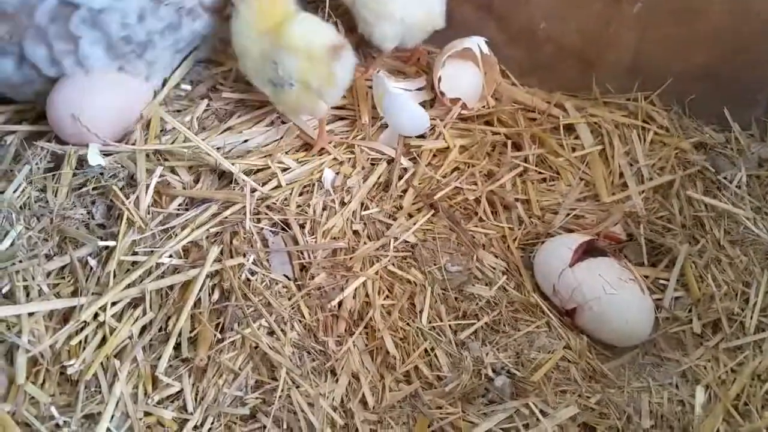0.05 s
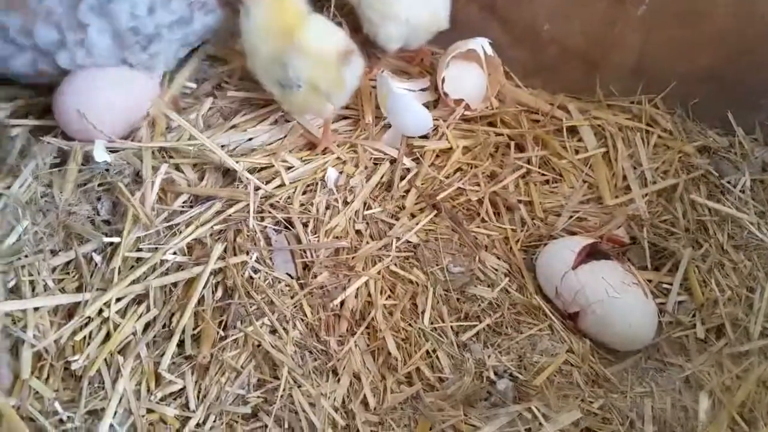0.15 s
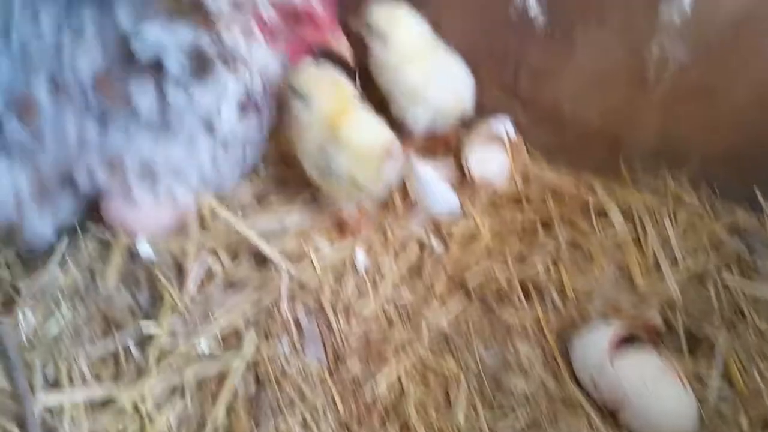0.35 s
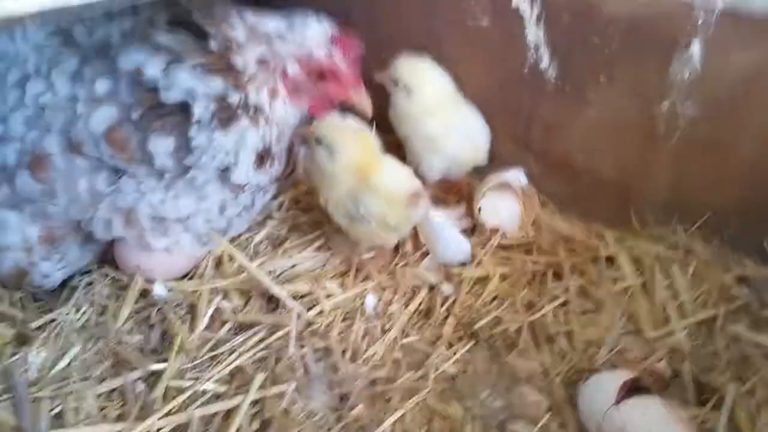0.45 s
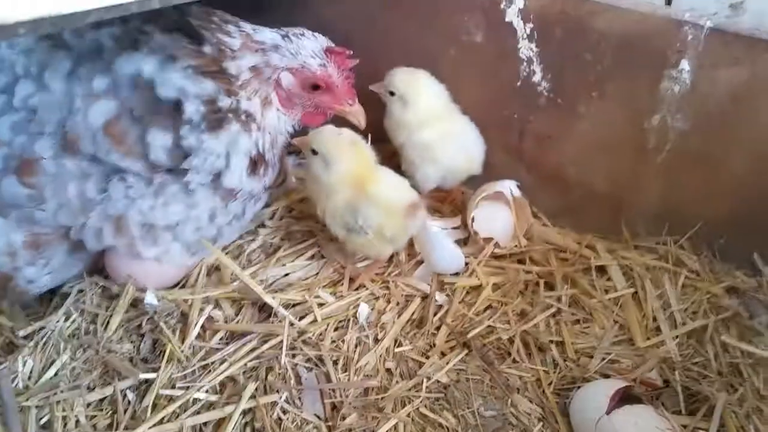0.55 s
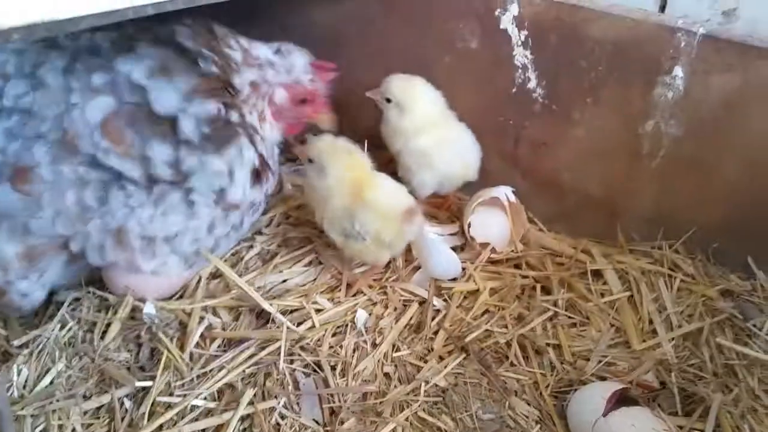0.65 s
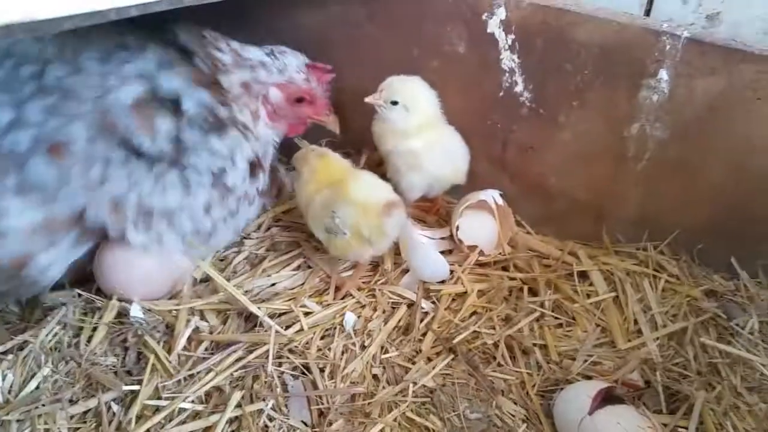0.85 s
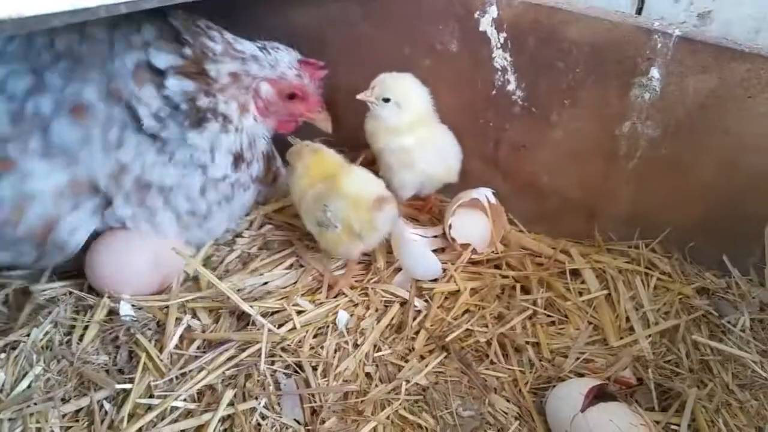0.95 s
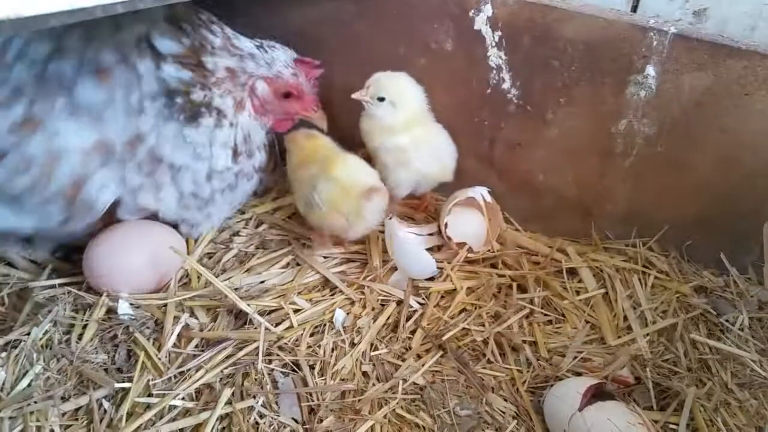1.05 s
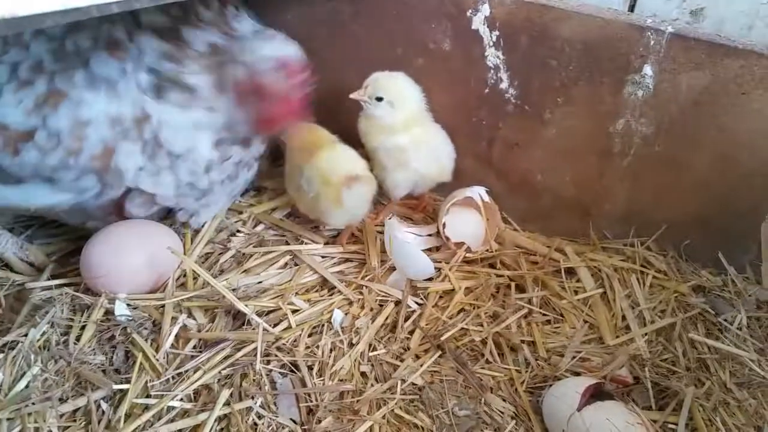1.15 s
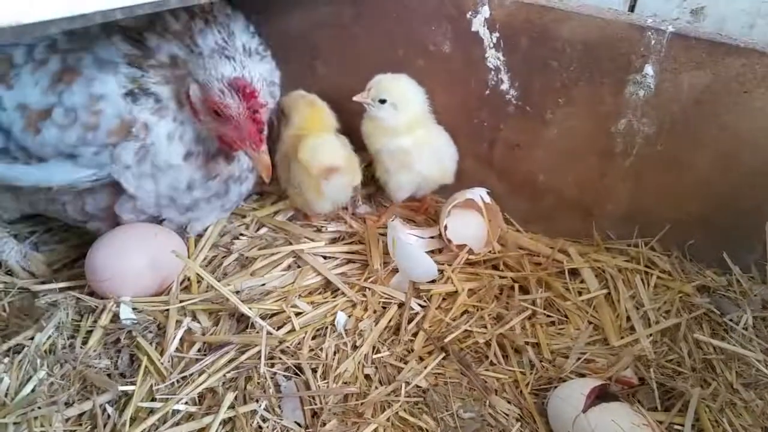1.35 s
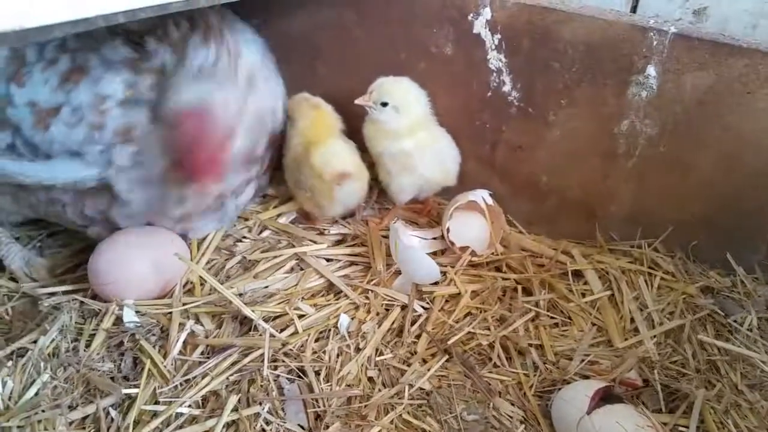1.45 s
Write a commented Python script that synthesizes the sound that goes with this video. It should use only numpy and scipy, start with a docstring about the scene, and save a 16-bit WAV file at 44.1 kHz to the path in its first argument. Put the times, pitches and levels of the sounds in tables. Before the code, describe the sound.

A hen clucks three times, close and a little to the left, murmuring softly in between. Her chicks give high, falling peeps around the clucks, while dry straw faintly rustles and ticks in a wooden nest box.

```python
"""In a wooden nest box, close by and a little to the left, a hen clucks three times and murmurs between.
Each cluck is a low, rough syllable and then a short, higher, louder one. Her voice is a source and a
filter: pulses of the syrinx excite the resonances of the throat. Her chicks give falling, nearly pure
peeps, and the box reflects both voices. Straw rustles and ticks as dry stalks crack; the hen shifts,
and a soft, breathy rustle comes and goes over a quiet background."""
import sys
import numpy as np
from scipy import signal
from scipy.fft import rfft, irfft
from scipy.io import wavfile
from scipy.ndimage import uniform_filter1d

SR = 44100
rng = np.random.default_rng(int(sys.argv[2]) if len(sys.argv) > 2 else 0)


def generate_wav(signal):
    """Clip the signal to [-1, 1] and save it as 16-bit WAV at the path in sys.argv[1]."""
    frames = np.transpose(np.atleast_2d(signal))
    scaled = np.clip(frames, -1, 1) * 32767
    pcm = np.round(scaled).astype(np.int16)
    wavfile.write(sys.argv[1], SR, pcm)


N = 66150

# Levels are relative: each source applies its own gain. A positive pan lies to the left.
# Spectra of the background, the shifting hen, a breathy upper-mid rustle and the straw: f/Hz, level/dB
BACKGROUND_SPECTRUM = [(20, -11), (45, -2), (100, -2), (190, -0.5), (330, -2.5), (480, 1), (620, -3.5),
                       (760, -11), (1000, 1), (1300, -23), (2400, -27), (4000, -56.5), (7500, -61.5),
                       (12000, -26.5), (15500, -39)]
SHIFTING_SPECTRUM = [(40, -27), (110, -11), (190, -3.5), (300, -13.5), (500, -24), (1000, -25),
                     (3000, -40.5)]
UPPER_RUSTLE_SPECTRUM = [(300, -10), (1000, -5.5), (1500, -7), (2100, 3.5), (2600, 1.5), (3300, -6.5),
                         (5000, -8.5), (7000, -21.5), (15000, -73)]
STRAW_SPECTRUM = [(200, -24.5), (600, 6.5), (1000, -5), (1500, 3.5), (2300, -0.5), (4000, 1), (7000, -11.5),
                  (12000, -8), (16000, -13.5)]
# Likeness of the noise at left and right: f/Hz, coherence/1
COHERENCE = [(50, 0.83), (180, 1), (550, 0.77), (1600, 0.067), (5000, 0.035)]
# Envelopes of the shifting hen, the upper-mid rustle and the straw: t/s, level/dB
SHIFTING_ENVELOPE = [(0, -54), (.15, -60), (.22, -46.5), (.3, -46.5), (.34, -40), (.42, -35.5), (.5, -54),
                     (.62, -48), (.9, -44.5), (1.0, -62), (1.08, -48), (1.18, -52.5), (1.25, -48.5),
                     (1.5, -45)]
UPPER_RUSTLE_ENVELOPE = [(0, -69), (.06, -58.5), (.12, -53), (.195, -52), (.22, -42), (.255, -40.5),
                         (.28, -54), (.38, -43), (.5, -53), (.66, -49.5), (.75, -46), (.95, -49),
                         (1.0, -48), (1.1, -50.5), (1.2, -51), (1.4, -49), (1.5, -55.5)]
STRAW_ENVELOPE = [(0, -50.5), (.07, -77), (.16, -64), (.22, -51.5), (.24, -40.5), (.265, -44), (.29, -47.5),
                  (.308, -46), (.324, -42), (.345, -55), (.38, -70), (.48, -48.5), (.52, -53), (.65, -51),
                  (.85, -57), (1.1, -55), (1.25, -57), (1.41, -54.5), (1.5, -57.5)]
# Snapping stalks: t/s, level/dB, tilt/(dB/octave), decay time/s
STRAW_SNAPS = [(0.036, -55, 2, 0.0061), (.072, -37, -8.5, 0.0014), (0.3781, -33.5, 1, 0.00098),
               (.521, -35, -12.5, 0.00069), (0.5493, -45, -13, 0.0014), (.795, -41.5, -2.5, 0.011),
               (.707, -38.5, -6.5, 0.011), (.97, -44.5, 14, 0.0012), (1.023, -46.5, 5, 0.0043),
               (1.127, -47, -0.5, .002), (1.383, -37.5, 1, 0.0017), (1.406, -41.5, 0, 0.0075)]

# Reverberation time of the box: f/Hz, T60/s
BOX_T60 = [(200, 0.083), (600, 0.12), (3000, 0.077), (10000, 0.11)]
# Early reflections of a peep off the walls, a left and a right list: delay/s, level/dB
WALL_REFLECTIONS = [
    [(.0021, -33), (.0068, -29)],
    [(.0033, -9), (.0052, -5.5)],
]
# Short peeps: t/s, duration/s, level/dB, start f/Hz, middle f/Hz, end f/Hz,
# loudest point/duration, pan/dB, second harmonic/dB
SHORT_PEEPS = [(-.02, .055, -55.5, 3736, 3583, 2850, .5, 8, -29),
               (0.37, 0.093, -40, 4200, 4396, 3660, 0.56, 11, -23),
               (0.867, 0.028, -46.5, 5476, 5110, 3430, 1, 12, -35),
               (0.893, 0.014, -37.5, 3570, 3340, 2250, 0, 3, -35),
               (1.259, 0.031, -46, 5470, 5090, 3720, 1, 5, -37),
               (1.29, 0.0073, -36.5, 3250, 2580, 2400, 0, 22, -19),
               (1.314, .068, -45.5, 4180, 4060, 3680, 0.62, 12, -38)]
# Course of one long falling peep: t/s, f/Hz, level/dB
LONG_PEEP = [(0.582, 4429, -38), (0.596, 4524, -49), (0.616, 4383, -33), (0.642, 3960, -27),
             (0.646, 3870, -28), (0.652, 3996, -45), (0.66, 3987, -35.5), (0.68, 3428, -38.5),
             (0.698, 3172, -27.5), (0.712, 2682, -33.5), (0.718, 2661, -35)]

# Low first syllables of the clucks, and soft notes (the tail of a cluck at the start, then murmurs):
# t/s, duration/s, level/dB, start f/Hz, middle f/Hz, end f/Hz, tilt/(dB/octave), roughness/1
LOW_SYLLABLES = [(.3935, 0.025, -24.5, 271.5, 234, 362, 3.5, 0.37),
                 (.8265, 0.025, -22.5, 268.6, 275.7, 362, 6.5, 0.31),
                 (1.129, 0.037, -21.5, 258.2, 245.6, 253, 3, 0.24)]
SOFT_NOTES = [(-.006, 0.023, -43, 627, 620, 594, -9.5, 0.03), (0.203, 0.035, -31.5, 235, 216.9, 213, 2, 0),
              (.226, 0.039, -35, 203.8, 213, 233, 0.5, 0), (.256, 0.043, -42.5, 196, 189, 187, -31, 0),
              (.366, 0.0324, -33, 419, 479, 505, 2, 0.31), (0.513, .02, -42, 460, 500, 490, 3.5, 0),
              (.549, 0.021, -44.5, 533, 506, 503, 3.5, 0.07), (.552, 0.035, -40.5, 192, 192, 181, -42, 0.2),
              (.647, 0.022, -37.5, 458, 492, 500, -4, .1), (0.703, 0.013, -35.5, 495, 496, 460, 8, 0.18),
              (0.719, 0.016, -46, 285, 254, 200, -6, 0.5), (1.231, 0.0049, -38.5, 214, 222, 198, 9, 0.54)]
# High second syllables, whose pitch breaks downward: t/s, duration/s, level/dB,
# f before/Hz, f after/Hz, time to the break/s, tilt/(dB/octave)
HIGH_SYLLABLES = [(0.4449, 0.015, -15.5, 608, 472, 0.0047, 2),
                  (0.8743, 0.02, -15, 630.5, 484.5, 0.00607, 0.5),
                  (1.1883, .019, -16, 643, 463, .0095, -1.5)]
# Vocal tract responses for low syllables, soft notes and high syllables: f/Hz, gain/dB
THROAT = [(30, -73), (90, -34.5), (170, -27), (270, 0), (380, 0.5), (490, -3.5), (620, 5), (735, -12.5),
          (850, -5), (1000, 0), (1130, -26), (1420, -30), (1800, -40), (2350, -37), (3300, -43.5),
          (7000, -55)]
SOFT_THROAT = [(80, -11), (200, -3.5), (460, 4), (650, -24), (850, -29), (1080, -14.5), (1500, -29.5),
               (2300, -11.5), (3800, -34.5), (7000, -52.5)]
OPEN_THROAT = [(30, -66), (100, -47), (300, -5), (400, -3.5), (480, 0.5), (560, -5), (640, 3.5), (735, -1),
               (850, -2.5), (960, -1.5), (1110, -15), (1280, -21.5), (1420, -16.5), (1650, -40.5),
               (2000, -33.5), (2450, -25), (3300, -40), (7000, -69)]
# Level of the hen's direct sound, left over right: f/Hz, level/dB
HEN_BALANCE = [(100, 4), (280, 6.5), (500, 8), (650, 9), (775, -0.5), (880, 5), (980, 13.5), (1420, 12),
               (2400, 16.5), (5000, -7)]
# Its phase lag, right behind left: f/Hz, lag/rad
HEN_PHASE_LAG = [(0, -5), (690, 0.57), (1460, -10), (1810, 0.5), (2410, -11.5), (3620, -7.5), (5170, 0),
                 (5600, -3.7), (7670, -15.5), (8700, -28.5), (11100, -22), (13000, -21.5), (14400, -5),
                 (15300, -8.5)]


def amp(db):
    """Amplitude ratio of a level in decibels."""
    return 10 ** (np.asarray(db) / 20)


def unit(x):
    """Normalisation to an rms of 1."""
    return x / np.sqrt(np.mean(x ** 2) + 1e-20)


def at_frequency(points, hz):
    """Interpolation on a logarithmic frequency axis."""
    f, value = np.transpose(points)
    return np.interp(np.log(hz + 1), np.log(np.abs(f) + 1), value)


def envelope(points):
    """Amplitude over time, interpolated in decibels."""
    return amp(np.interp(np.arange(N) / SR, *np.transpose(points)))


def pan(db):
    """Direction by level: left and right gains db apart, with a mean of 1."""
    return amp(np.array([[db], [-db]]) / 2) / np.cosh(db * np.log(10) / 40)


def add(mix, start, sound):
    """Superposition of a sound on the mix, from a start in seconds."""
    at = round(start * SR)
    sound = sound[max(-at, 0):]
    part = mix[max(at, 0):][:len(sound)]
    part += sound[:len(part)]


def colour(x, points, size=4096):
    """Minimum-phase filtering: the Hilbert transform of the log gain sets the phase."""
    log_gain = np.log(amp(at_frequency(points, abs(np.fft.fftfreq(size, 1 / SR)))))
    taps = np.fft.ifft(np.exp(np.conj(signal.hilbert(log_gain)))).real[:size // 2]
    return signal.fftconvolve(x, taps)


def wobble(count, size):
    """Random modulation: noise smoothed over size samples, of rms near 1."""
    smooth = uniform_filter1d(rng.standard_normal(N), size)
    return unit(uniform_filter1d(smooth, size // 3))[:count]


def glide(u, first, middle, last):
    """A parabola through three pitches as u runs from 0 to 1."""
    return first * (1 - u) * (1 - 2 * u) + middle * (2 * u) * (2 - 2 * u) + last * u * (2 * u - 1)


def diffuse_noise(spectrum):
    """A steady diffuse field: left and right are coherent only at long wavelengths."""
    hz = np.fft.rfftfreq(N, 1 / SR)
    left, independent = rfft(rng.standard_normal((2, N)))
    coherence = at_frequency(COHERENCE, hz)
    right = coherence * left + np.sqrt(1 - coherence ** 2) * independent
    return pan(7.5) * unit(irfft(np.array([left, right]) * amp(at_frequency(spectrum, hz)), N))


def nest_noises():
    """Amplitude-modulated noise: a low band as the hen shifts, and a soft, breathy upper-mid rustle."""
    shifting = amp(-3) * envelope(SHIFTING_ENVELOPE) * diffuse_noise(SHIFTING_SPECTRUM)
    upper_rustle = amp(-0.5) * envelope(UPPER_RUSTLE_ENVELOPE) * diffuse_noise(UPPER_RUSTLE_SPECTRUM)
    return shifting + upper_rustle


def straw(cracks_per_s=7000, spread_db=2.5, clump_db=1.5, crunch_db=3.5, shared_power=0.18):
    """Shot noise: countless tiny cracks of dry stalks merge into a rustle; a few snaps stand out."""
    size_db = spread_db * np.minimum(rng.exponential(1, (3, N)), 5)  # left, right, common to both
    cracks = amp(size_db + clump_db * wobble(N, size=500)) * rng.standard_normal((3, N))
    cracks *= rng.random((3, N)) < cracks_per_s / SR
    paths = np.array([unit(colour(train, STRAW_SPECTRUM)[:N]) for train in cracks])
    paths *= amp(0.5) * envelope(STRAW_ENVELOPE)
    t = np.arange(SR // 20) / SR
    for start, db, tilt_db, decay in STRAW_SNAPS:
        spectrum = [(hz, gain_db + tilt_db * np.log2(hz / 1000)) for hz, gain_db in STRAW_SPECTRUM]
        for path in paths:
            burst = rng.standard_normal(len(t)) * np.sqrt(t / decay) * np.exp(-t / decay)
            snap = colour(burst * amp(crunch_db * wobble(len(t), size=40)), spectrum)
            add(path, start, amp(db) * snap / np.sqrt(np.sum(snap ** 2) / (decay * SR)))
    return pan(4) * (np.sqrt(1 - shared_power) * paths[:2] + np.sqrt(shared_power) * paths[2])


def box_reverberation(x, build_up_s=0.013):
    """Diffuse reflections in the nest box and coop decay exponentially, each band at its own rate."""
    hz, t, bands = signal.stft(rng.standard_normal((2, SR // 2)), SR, nperseg=256)
    decay = amp(-60 * t / at_frequency(BOX_T60, hz)[:, None])
    tail = signal.istft(bands * decay, SR, nperseg=256)[1]
    tail *= np.minimum(np.arange(tail.shape[1]) / SR / build_up_s, 1)
    return pan(7.8) * signal.fftconvolve(x[None], tail / np.linalg.norm(tail[0]), axes=1)[:, :N]


def whistle(hz, octave_db, waver=0.02, flutter_db=-0.5):
    """A chick's nearly pure tone, under slight random frequency and amplitude modulation."""
    phase = 2 * np.pi * np.cumsum(hz * (1 + waver * wobble(len(hz), size=40))) / SR
    flutter = amp(flutter_db * wobble(len(hz), size=260))
    return np.sqrt(2) * flutter * (np.sin(phase) + amp(octave_db) * np.sin(2 * phase))


def chicks():
    """Falling peeps arrive as direct sound, early wall reflections and reverberation."""
    out = np.zeros((2, N))
    for start, length, db, first, middle, last, peak, pan_db, octave_db in SHORT_PEEPS:
        u = np.arange(0, length, 1 / SR) / length
        swell = np.interp(u, [0, np.clip(peak, .1, .95), 1], [.15, 1, .3])
        swell *= signal.windows.tukey(len(u), .15)
        peep = amp(db) * swell * whistle(glide(u, first, middle, last), octave_db)
        for channel, gain in zip(out, pan(pan_db)):
            add(channel, start, gain * peep)
    times, hz, db = np.transpose(LONG_PEEP)
    t = np.arange(times[0], times[-1], 1 / SR)
    swell = amp(np.interp(t, times, db) - 4) * signal.windows.tukey(len(t), .06)
    long_peep = swell * whistle(np.interp(t, times, hz), octave_db=-35)
    for channel, gain in zip(out, pan(12)):
        add(channel, times[0], gain * long_peep)
    for channel, direct, reflections in zip(out, out.copy(), WALL_REFLECTIONS):
        for delay, db in reflections:
            add(channel, delay, amp(db) * direct)
    return out + amp(-8.5) * box_reverberation(out.mean(0))


def syllable(hz, db, tilt_db, rough, tract, attack_s, release_s, opening_db, jitter):
    """Source and filter: jittered pulses of the syrinx, each with a puff of air, ring the throat."""
    t = np.arange(len(hz)) / SR
    cycles = np.cumsum(hz * (1 + jitter * wobble(len(t), size=80))) / SR
    slope_db = tilt_db + opening_db * (t / t[-1] - .5)  # opening brightens the voice as it goes
    pulses = sum(amp(slope_db * min(np.log2(k), 2)) * np.cos(2 * np.pi * k * cycles)
                 for k in range(1, 20))
    puffs = (0.26 + np.exp(-(cycles % 1) / 0.32)) * rng.standard_normal(N // 4)[:len(t)]
    source = (1 - rough) * unit(pulses) + rough * unit(puffs)
    ramp = np.clip(np.minimum(t / attack_s, (t[-1] - t) / release_s), 0, 1)
    voice = colour(np.sin(np.pi / 2 * ramp) ** 2 * source, tract)
    return amp(db) * voice / np.sqrt(np.sum(voice ** 2) / len(t))


def soft_notes():
    """Quiet voiced glides filtered by the tract: the tail of a cluck at the start, then murmurs."""
    voice = np.zeros(N)
    for start, length, db, first, middle, last, tilt_db, rough in SOFT_NOTES:
        hz = glide(np.arange(0, length, 1 / SR) / length, first, middle, last)
        add(voice, start, syllable(hz, db, tilt_db, rough, SOFT_THROAT,
                                   attack_s=0.0024, release_s=0.01, opening_db=0, jitter=0.039))
    return voice


def clucks(break_width_s=0.0016):
    """Irregular pulses make a low syllable rough; a steadier, higher one follows with a pitch break."""
    voice = np.zeros(N)
    for start, length, db, first, middle, last, tilt_db, rough in LOW_SYLLABLES:
        hz = glide(np.arange(0, length, 1 / SR) / length, first, middle, last)
        add(voice, start, syllable(hz, db, tilt_db, rough, THROAT,
                                   attack_s=0.003, release_s=0.0075, opening_db=5, jitter=0.069))
    for start, length, db, before, after, break_s, tilt_db in HIGH_SYLLABLES:
        t = np.arange(0, length, 1 / SR)
        hz = after + (before - after) * (1 - np.tanh((t - break_s) / break_width_s)) / 2
        add(voice, start, syllable(hz, db, tilt_db, rough=0.1, tract=OPEN_THROAT,
                                   attack_s=0.0024, release_s=0.0029, opening_db=7, jitter=0.018))
    return voice


def hen():
    """Localisation: her voice reaches left and right with unequal level and phase; the box rings."""
    voice = clucks() + soft_notes()
    hz = np.fft.rfftfreq(N, 1 / SR)
    right_gain = amp(-at_frequency(HEN_BALANCE, hz))
    right_lag = at_frequency(HEN_PHASE_LAG, hz)
    right = irfft(rfft(voice) * right_gain * np.exp(-1j * right_lag), N)
    return amp(3) * np.array([voice, right]) + amp(-17) * box_reverberation(voice)


def scene():
    """Superposition of the nest noises, the voices and the background."""
    return nest_noises() + hen() + chicks() + straw() + amp(-51) * diffuse_noise(BACKGROUND_SPECTRUM)


def record(dry, cutoff_hz=15850):
    """Band limiting by a linear-phase low-pass filter."""
    taps = signal.firwin(511, cutoff_hz, window=("kaiser", 9), fs=SR)
    return signal.oaconvolve(dry, taps[None], "same")


dry = scene()
out = record(dry)
generate_wav(out)
```